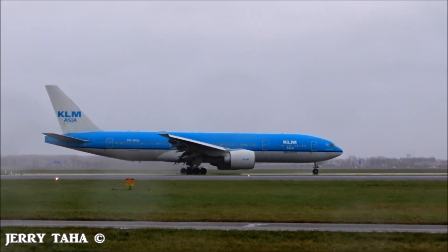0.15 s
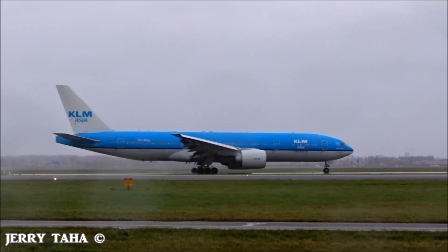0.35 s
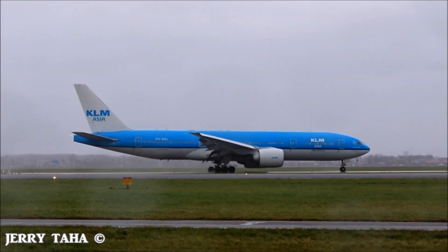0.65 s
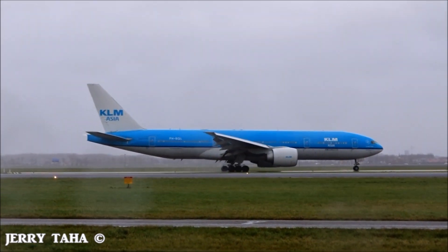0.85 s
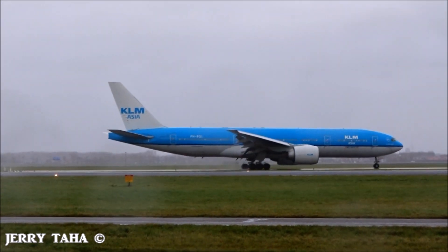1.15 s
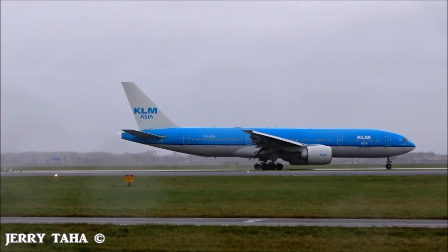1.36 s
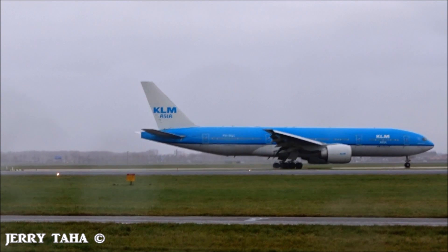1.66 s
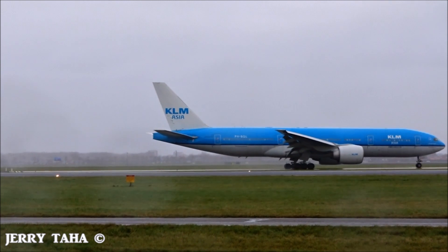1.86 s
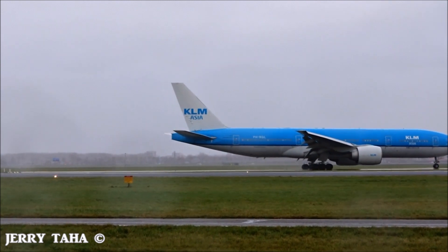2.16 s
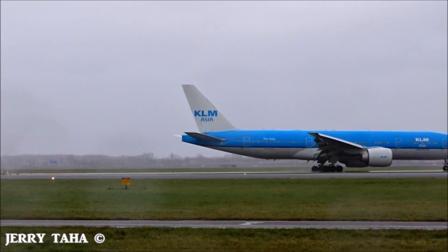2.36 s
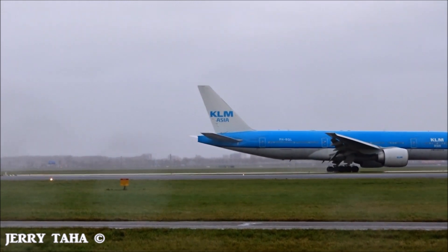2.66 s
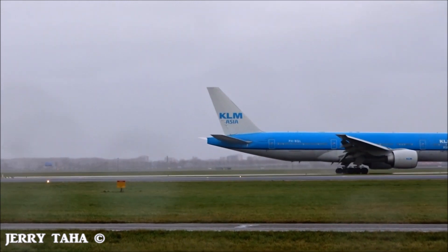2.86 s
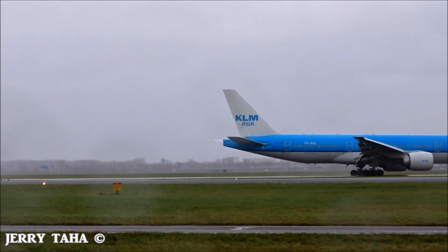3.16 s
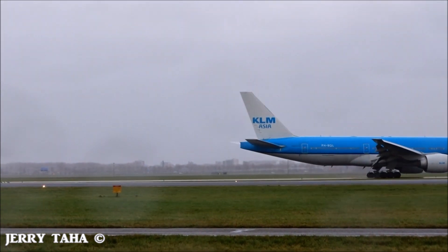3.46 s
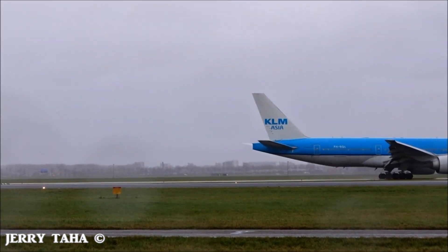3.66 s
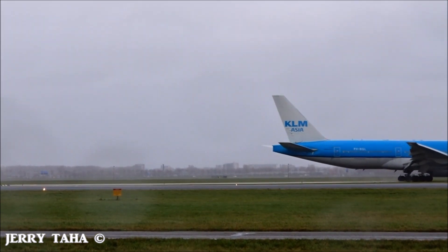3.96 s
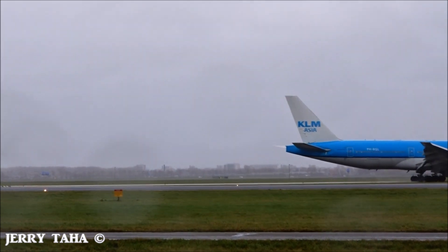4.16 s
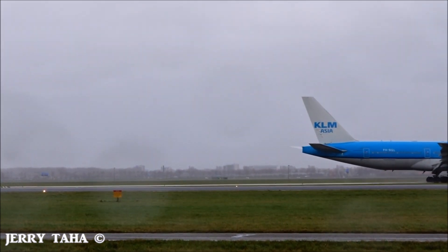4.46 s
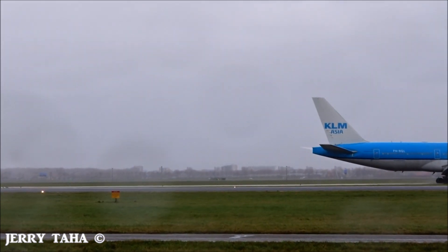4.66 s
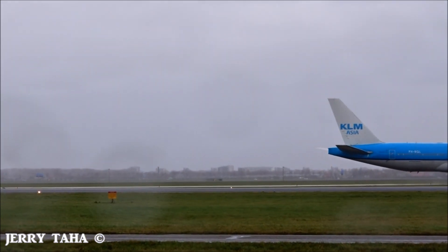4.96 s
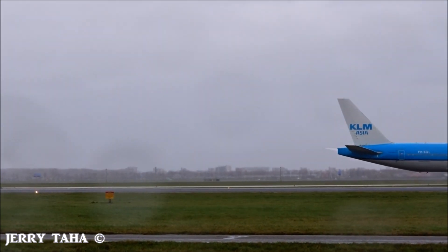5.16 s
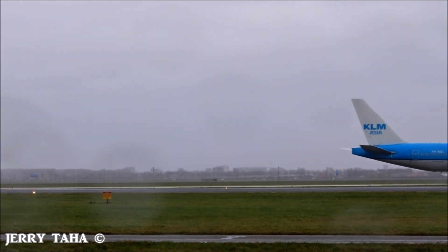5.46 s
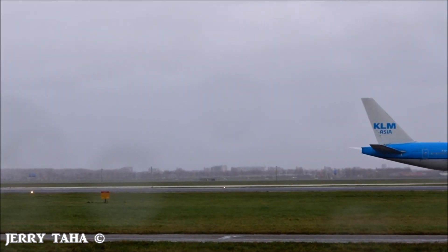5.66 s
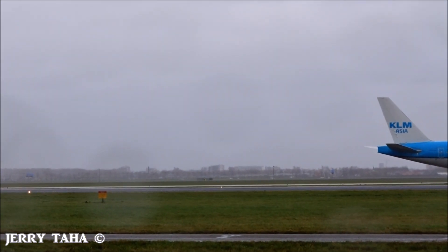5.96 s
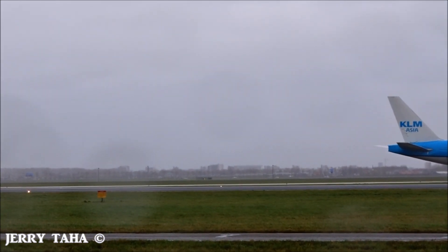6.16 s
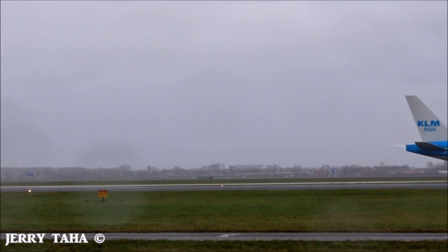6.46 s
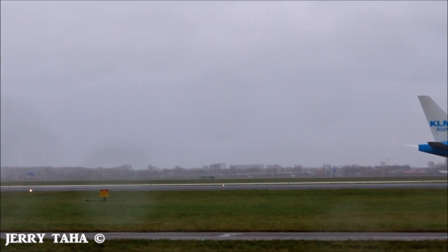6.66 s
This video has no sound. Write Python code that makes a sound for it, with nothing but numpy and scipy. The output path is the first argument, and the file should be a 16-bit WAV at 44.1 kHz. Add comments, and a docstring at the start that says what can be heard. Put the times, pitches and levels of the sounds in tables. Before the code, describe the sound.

Violent, crackling wind buffeting almost buries the dull roar of a large jet rolling away on a runway, with scattered rain ticks and plastic knocks.

```python
"""Airliner in a storm, from across the grass

A large airliner rolls along a wet runway; its roar is shaped noise that shows in the lulls and fades as it moves off.
Gusts bury it at the camera's two microphone ports: noise shaped into buffeting, rumble, hiss and a hollow howl.
Raindrops tick on the camera as short damped tones, and knocks ring the modes of its housing.
A limiter holds the strongest blasts."""
import sys
import numpy as np
from scipy import signal
from scipy.fft import rfft, irfft, next_fast_len
from scipy.io import wavfile
from scipy.ndimage import uniform_filter1d, minimum_filter1d

SR = 44100
rng = np.random.default_rng(int(sys.argv[2]) if len(sys.argv) > 2 else 0)


def dump(signal):
    """Clip the signal to [-1, 1] and save it as 16-bit WAV at the path in sys.argv[1]."""
    limited = np.clip(np.atleast_2d(signal).T, -1, 1)
    pcm = np.round(limited * 32767).astype(np.int16)
    wavfile.write(sys.argv[1], SR, pcm)


N = 299873  # length in samples

FULL_DB = -17.5  # strength of a full gust


def undb(db):
    """Decibels to gain."""
    return 10 ** (np.asarray(db) / 20)


def curves(table):
    """The columns of a table joined by straight lines in time."""
    s, *columns = np.transpose(table)
    return [np.interp(np.arange(N) / SR, s, c) for c in columns]


def across(table, hz):
    """The columns of a table joined by straight lines in log frequency."""
    f, *columns = np.transpose(table)
    return [np.interp(np.log(hz), np.log(f), c) for c in columns]


def pan(db):
    """Left and right gains for a left minus right level difference."""
    return undb(np.array([[.5], [-.5]]) * db)


def walk(rate):
    """Random levels held about 1 / rate s and smoothed twice; spread near 1."""
    k = max(int(SR / rate), 2)
    held = np.repeat(rng.standard_normal(N // k + 2), k)[:N]
    return uniform_filter1d(uniform_filter1d(held, k), k) * np.sqrt(2)


def bins():
    """Frequencies of the bins in which noise is coloured."""
    size = next_fast_len(N // 2 + 1)
    return np.maximum(np.arange(size + 1) * SR / (2 * size), 1)


def turbulence(colour, likeness, lag=0, balance_db=0):
    """Coloured noise at two ports that share part of it; lag is the left's, in radians; their mean has rms 1."""
    hz = bins()
    shared, apart = rfft(rng.standard_normal((2, 2 * len(hz) - 2)))
    alike = np.clip(likeness, 0, 1)
    sign = np.array([[1], [-1]])  # left, right
    pair = np.sqrt(1 + alike) * shared + sign * np.sqrt(1 - alike) * apart
    pair = pair * np.exp(-.5j * sign * lag) * pan(balance_db)
    x = irfft(pair * undb(across(colour, hz)[0]))[:, :N]
    return x / x.mean(axis=0).std()


def split(x, hz):
    """The parts of a sound below and above a frequency."""
    low = signal.sosfiltfilt(signal.butter(3, hz, fs=SR, output="sos"), x)
    return low, x - low


def steady(x, seconds):
    """Even out the slow swells of a noise, leaving its quick flutter."""
    size = int(seconds * SR)
    power = uniform_filter1d(x.mean(axis=0) ** 2, size)
    return x / np.sqrt(uniform_filter1d(power, size))


def swell(start, rise, hold, decay):
    """An envelope that rises, holds and dies away."""
    t = np.arange(N) / SR - start
    return np.clip(t / rise, 0, 1) * np.exp(-np.maximum(t - rise - hold, 0) / decay)


def add(out, s, sound):
    """Mix a short sound in at its time."""
    start = int(s * SR)
    out[:, start:start + sound.shape[-1]] += sound[..., :N - start]


def jet(waver_db=1.7):
    """Exhaust roar and fan rush from afar; the moving air makes each waver and soaks up the top."""
    # The jet rolling past and away. Each row: time in seconds, level in dB.
    passing = [(0, -27.5), (2.15, -26), (2.8, -26.5), (3.3, -25), (5, -33), (6.1, -32), (6.35, -33),
               (6.8, -46)]
    # Spectrum of the distant engines. Each row: frequency in Hz, relative density in dB per Hz.
    engine_colour = [(30, -7), (120, 3.5), (250, 4), (420, 4.5), (700, 1.5), (1100, -1.5), (1700, -5),
                     (2500, -14.5), (3600, -22), (5000, -35), (6000, -62), (7500, -49), (15000, -72)]
    likeness = across([(100, 0.75), (900, 0.48), (4000, 0.68)], bins())[0]  # Hz, 0-1
    exhaust, fan = split(turbulence(engine_colour, likeness, 0.26, 1.8), 1180)
    exhaust = exhaust * undb(waver_db * walk(9.8))
    fan = fan * undb(0.66 * waver_db * walk(19))
    return (exhaust + fan) * undb(curves(passing)[0])


def raindrops(strength_db, swell_s=0.000087, count=80, spray_db=-36, spread_db=3, splash_db=-13):
    """Each drop gives a dead tick of a few cycles; the gusts throw fine spray between the large ones."""
    # Large drops on the camera, before their splash is softened.
    # Each row: start in seconds, peak in dB, pitch in Hz, left minus right in dB.
    large = [(.5555, -15, 2320, -3), (2.1135, -18.5, 3330, -5), (2.1571, -9.5, 2150, -3),
             (2.182, -24, 3200, 0), (3.0596, -4, 2420, -9), (3.305, -28, 4200, 3), (3.497, -24, 4370, -7),
             (3.7515, -25, 5500, -2), (3.777, -27, 5200, -2), (4.25, -13, 3200, -2), (4.458, -8, 2960, -16),
             (6.0507, -37, 5900, 0), (6.299, -29, 4500, -3)]
    out = np.zeros((2, N))
    t = np.arange(SR // 100) / SR
    thrown_db = spray_db + strength_db - FULL_DB
    spray = []
    for when, size, pitch, side in rng.random((count, 4)):
        peak_db = thrown_db[int(when * N)] - spread_db * np.log(size + .02)
        spray.append((when * N / SR, peak_db, 2500 + 2500 * pitch, -6 * side))
    for s, db, hz, side_db in list(large) + spray:
        tick = (t / swell_s) ** 2 * np.exp(-t / swell_s) * np.sin(2 * np.pi * hz * t)
        add(out, s, tick / np.abs(tick).max() * undb(db) * pan(side_db))
    dull, splash = split(out, 6800)
    return dull + undb(splash_db) * splash


def muffle(x, hz=5400, leak_db=-33):
    """The housing passes little treble to the ports."""
    return signal.sosfilt(signal.butter(10, hz, fs=SR, output="sos"), x) + undb(leak_db) * x


def knocks(contact_s=0.0018, rattle=0.3, place_db=2.0, press_s=0.00054):
    """A short, rattling contact cracks and rings the plastic housing; harder blows wake the higher modes."""
    # Knocks, some with a bounce, before the housing muffles them. Each row: start in seconds,
    # peak of the ring in dB, share of the full ring time, crack 0-1, hardness in dB per octave.
    blows = [(.506, -10, 0.5, .02, .5), (.5074, -13, .5, .02, -4), (2.682, -11, 0.64, 0.3, -9),
             (2.684, -14, .5, .02, -8), (5.845, -22, .63, .05, -5.5), (5.856, -16.5, .75, .04, -6),
             (6.0374, -15, 0.96, .9, -4), (6.0455, -20, .9, .04, -7), (6.134, -26, .4, .2, -4)]
    # What the housing rings with, before hardness and place act.
    # Each row: frequency in Hz, level in dB, full 60 dB ring time in seconds.
    modes = [(1380, 4, .035), (1570, -1, 0.025), (1773, 9, .056), (1864, 2, .04), (2030, 2, .036),
             (2200, -2, .02), (3500, -4, .008), (4100, -5, .008), (5160, 1.5, .02)]
    out = np.zeros((2, N))
    t = np.arange(SR // 8) / SR
    for s, db, length, crack, hardness_db in blows:
        favour = place_db * rng.standard_normal(len(modes))  # each blow favours other modes
        ring = np.zeros(len(t))
        for (hz, mode_db, t60), more_db in zip(modes, favour):
            start_db = mode_db + more_db + hardness_db * np.log2(hz / modes[0][0])
            ring += undb(start_db - 60 * t / (t60 * length)) * np.sin(2 * np.pi * hz * t)
        chatter = rng.standard_normal(len(t)) * np.exp(-t / contact_s)
        rattling = signal.fftconvolve(chatter / np.linalg.norm(chatter), ring)[:len(t)]
        body = ring + rattle * rattling
        press = 1 - np.exp(-t / press_s)
        body = body / np.abs(press * body).max()
        add(out, s, press * (body + crack * np.diff(chatter, prepend=0)) * undb(db))
    return muffle(out)


def gusts(collapse=0.21, breeze_rasp_db=-18, breeze_hiss_db=-52, breeze_howl_db=-30):
    """Wind strength in dB and its power-weighted colour; a spent gust collapses into the breeze."""
    # Gusts on the ports, before the collapse sharpens their ends. Each row: start, rise, hold and decay
    # in seconds, strength in dB, then relative levels in dB: upper roar (to the deep roar),
    # rasp, hiss and howl (to the strength), all before each sound's own trims.
    blasts = [(-.083, 0.057, 0.29, 0.058, -14.5, 4, -14, -34.5, -33),
              (0.294, 0.023, 0.14, 0.016, -19, 7.5, -19.5, -48, -24),
              (0.517, 0.032, 0.051, 0.062, -12, 1.5, -17.5, -49, -22),
              (0.599, .025, 0.073, 0.042, -14, 0.5, -12.5, -40, -24),
              (0.692, 0.045, 0.26, 0.33, -15, 5.5, -15.5, -42.5, -11),
              (1.133, 0.032, 0.092, 0.019, -15.5, 1, -16.5, -39, -33),
              (1.272, 0.024, 0.16, 0.031, -14.5, 2, -14.5, -47.5, -18),
              (1.45, 0.022, 0.27, 0.15, -14, 6.5, -15, -45, -7.5),
              (1.702, .012, .035, .015, -15, 3, -9, -40, -20),
              (1.834, 0.016, 0.032, 0.035, -10, 2, -13.5, -44, -18),
              (1.932, 0.02, 0.042, 0.023, -14.5, 4, -15, -46, -17),
              (2.003, .015, .035, .022, -19, 8, -16, -46, -13),
              (2.066, 0.023, 0.19, .03, -29.5, -2, -9, -42, -20),
              (2.257, 0.071, .28, 0.027, -13, 4, -17, -49, -15),
              (2.615, 0.016, 0.029, 0.018, -16.5, 3, -12.5, -44, -18),
              (2.706, 0.003, 0.011, .006, -15, -3, -22, -51, -11),
              (2.728, 0.0058, 0.013, .03, -24, 6, -15, -40, -20),
              (2.826, 0.018, 0.24, 0.1, -14, 1, -15, -45.5, -12),
              (3.151, 0.012, 0.035, 0.015, -20, 2, -15.5, -46, -22),
              (3.279, .01, .025, .015, -23.5, 4, -18, -52, -22),
              (3.34, 0.019, 0.01, 0.033, -17, 2, -20.5, -58, -25),
              (3.432, 0.015, 0.011, 0.034, -15, -3, -21, -55, -25),
              (3.479, .012, 0.016, .012, -19, -2, -18, -52, -22),
              (3.528, 0.0087, 0.006, 0.011, -10, -1.5, -22, -49, -25),
              (3.551, 0.0094, 0.033, .018, -13, -2.5, -18, -48, -27),
              (3.603, 0.04, 0.13, 0.014, -12.5, -2, -17.5, -45.5, -25),
              (3.794, .022, 0.99, 0.1, -12.5, -1.5, -15.5, -40, -17),
              (4.835, 0.033, 0.06, 0.063, -8, 0.5, -14.5, -39, -9),
              (4.963, 0.05, 0.52, 0.34, -14.5, 1.5, -15, -38.5, -7.5),
              (5.787, 0.021, 0.03, 0.0098, -18.5, -1, -18, -44, -22),
              (5.845, .006, .018, .012, -20.5, 6.5, -21, -47.5, -16),
              (5.89, 0.0088, 0.026, 0.009, -20.5, 7, -22, -53, -20),
              (5.965, 0.0073, .036, 0.034, -19.5, -2.5, -20.5, -48, -24),
              (6.262, 0.06, 0.13, 0.5, -19.5, 3, -15, -37.5, -30)]
    # The steady wind under the gusts. Each row: time in seconds, level in dB.
    breeze = [(0, -27), (.42, -19.5), (.49, -21.5), (.6, -20), (1.5, -21.5), (1.95, -19), (2.15, -28),
              (2.8, -29), (3.3, -27), (3.5, -22.5), (4.1, -35), (5.95, -34), (6.11, -43), (6.24, -32),
              (6.3, -29), (6.8, -47)]
    powers = [undb(curves(breeze)[0]) ** 2]
    colours = [(0.0042, breeze_rasp_db, breeze_hiss_db, breeze_howl_db)]
    for start, rise, hold, decay, db, *colour in blasts:
        flow = swell(start, rise, hold, decay)
        flow = flow * np.tanh((flow / collapse) ** 4)
        powers.append((flow * undb(db)) ** 2)
        colours.append(colour)
    total = np.sum(powers, axis=0)
    return 10 * np.log10(total), *(np.transpose(colours) @ np.array(powers) / total)


def hiss(eddies, strength_db, share_db, steepen=0.25, floor_db=-78,
         flicker_db=1.0, sputter_db=1.56, drift_db=0.76):
    """A thin, flickering hiss grows faster than the gust that drives it, and flares in short spurts."""
    # Spectrum of the hiss. Each row: frequency in Hz, relative density in dB per Hz.
    hiss_colour = [(3000, -7), (6000, 8), (7000, 6.5), (8200, 2), (10000, 2.5), (13000, -3), (15500, -8)]
    # Spurts of fine hiss, before the flicker. Each row: start in seconds, hold in seconds, level in dB.
    flares = [(0.59, 0.053, -48.5), (0.855, 0.03, -49), (1.275, 0.033, -52), (1.359, 0.11, -50),
              (1.625, 0.2, -50.5), (1.712, 0.0094, -53), (1.847, 0.019, -46), (2.35, 0.028, -51.5),
              (2.61, 0.022, -55), (2.93, 0.031, -55), (4.363, 0.13, -53), (4.88, .03, -53),
              (5.26, .03, -57), (6.45, 0.053, -59)]
    rise_s, decay_s = 0.017, 0.018
    likeness = across([(7500, .15), (12000, 0.98)], bins())[0]  # Hz, 0-1
    driven = undb(strength_db + share_db + steepen * (strength_db - FULL_DB))
    spurts = sum(undb(db) * swell(s, rise_s, hold, decay_s) for s, hold, db in flares)
    level = np.sqrt(driven ** 2 + spurts ** 2 + undb(floor_db) ** 2)
    flicker = undb(flicker_db * eddies + sputter_db * walk(220) + drift_db * walk(21.0))
    return turbulence(hiss_colour, likeness, 0, -.8) * level * flicker


def howl(level_db, width_hz=90, side_db=-2.5):
    """Air streaming past the camera rings in a broad note whose pitch rises a little, then sinks."""
    # Pitch of the hollow howl. Each row: time in seconds, centre in Hz.
    howl_pitch = [(0, 660), (1.7, 741), (3, 722.5), (4.2, 432.5), (5.2, 372.5), (6.8, 363)]
    hz = curves(howl_pitch)[0]
    swirl = walk(2 * width_hz) + 1j * walk(2 * width_hz)  # random level and phase broaden the note
    note = (swirl * np.exp(2j * np.pi * np.cumsum(hz) / SR)).real
    return note * undb(level_db) * pan(side_db)


def rumble(trim_db=0, waver_db=1.5):
    """Eddies larger than the camera push on both ports nearly alike: a lumpy bed, and single thumps."""
    # Spectrum of the rumble. Each row: frequency in Hz, relative density in dB per Hz.
    rumble_colour = [(12, -21), (25, -11), (45, -4), (72, -5.5), (110, -6), (200, -19.5), (500, -86)]
    # Bed between the thumps, before it wavers. Each row: time in seconds, level in dB.
    bed_level = [(0, -39), (.45, -22.5), (1.5, -29.5), (2.5, -27.5), (3.7, -26.5), (4.1, -49), (4.7, -35),
                 (5.9, -31), (6.2, -37.5), (6.8, -38)]
    # Large eddies that thump. Each row: centre in seconds, half length (bell spread) in seconds, level in dB.
    large_eddies = [(0.295, .04, -20), (.59, 0.04, -24), (.78, 0.034, -26), (1.077, .06, -20),
                    (1.61, .025, -16), (1.968, 0.024, -16), (2.088, .03, -25), (2.228, 0.022, -22),
                    (2.31, 0.033, -14), (2.598, 0.04, -19), (2.71, 0.009, -16), (2.885, 0.034, -21),
                    (3.574, .05, -19.5), (4.108, .025, -23), (4.9, .03, -19.5), (5.25, 0.036, -35),
                    (5.855, .025, -24), (6.05, 0.025, -26.5), (6.304, 0.03, -21.5)]
    t = np.arange(N) / SR
    bed = undb(curves(bed_level)[0] + waver_db * walk(14))
    thumps = sum(undb(db) * np.exp(-.5 * ((t - s) / half) ** 2) for s, half, db in large_eddies)
    air = steady(turbulence(rumble_colour, 0.85, .12, .6), 0.098)
    return air * np.hypot(bed, thumps) * undb(trim_db)


def spits(per_s=190, length_s=.0013):
    """Small eddies burst at random, at each port on its own: a spiky power envelope with mean 1."""
    bursts = (rng.random((2, N)) < per_s / SR) * rng.exponential(size=(2, N))
    t = np.arange(SR // 50) / SR
    power = signal.oaconvolve(bursts, [t * np.exp(-2 * t / length_s)], axes=1)[:, :N]
    return np.abs(power) / power.mean()


def buffeting(eddies, strength_db, lift_db, small_db, flutter_db=0.53, rasp_flutter_db=0.78,
              headroom=4.9, body_db=0.55, rasp_db=-0.53, waver_db=0.3, fitful_db=0.85,
              lump_db=0.75, surge_db=0.7, burst_share=.4):
    """Eddies break on the ports: a deep roar and a crackling rasp; weak wind comes in fits."""
    # Spectrum of the buffeting, before the gusts tilt it.
    # Each row: frequency in Hz, relative density in dB per Hz.
    buffet_colour = [(40, -21), (90, -6), (135, 1.5), (200, 0.5), (290, -1.5), (450, -4), (800, -8),
                     (1150, -13), (1500, -18.5), (2350, -25), (2900, -26.5), (5000, -38.5), (5900, -44.5),
                     (7000, -73), (9000, -75)]
    # How the two ports differ in the wind, before it veers. Each row: frequency in Hz, likeness 0-1,
    # left lag in radians, left minus right in dB.
    ports = [(60, 0.84, .25, -0.5), (132, 1, 0.66, 0.5), (274, 0.67, 0.62, -2.5), (445, 0.49, 0.33, -2),
             (850, 0.88, 0.97, -0.5), (1290, 0.95, 0.76, -2), (2400, .53, 0.16, -6.5),
             (2830, 0.57, 0.16, -4.5), (3800, 0.87, 0.41, -3.5), (5500, 0.7, 0.7, -2.5), (7000, .3, .7, -9)]
    air = turbulence(buffet_colour, *across(ports, bins()))
    roar, rasp = split(air, 1523)
    deep, upper = split(roar, 570)
    flutter = (eddies + walk(130)) / np.sqrt(2)
    # part of the power comes in separate bursts
    crackle = np.sqrt(1 - burst_share + burst_share * spits())
    upper = upper * np.sqrt(crackle) * undb(lift_db + flutter_db * flutter)
    roar = steady(deep + upper, 0.027)
    rasp = steady(rasp * crackle * undb(rasp_flutter_db * eddies), 0.053)
    rasp = rasp * undb(small_db + rasp_db + surge_db * walk(40))
    # the narrow ports choke the largest pressure swings
    roar = headroom * np.tanh(roar / headroom)
    roar = roar * undb(body_db + lump_db * walk(60))
    weak = 1 / (1 + undb(2 * (strength_db - FULL_DB)))
    return (roar + rasp) * undb(strength_db + (waver_db + fitful_db * weak) * walk(55))


def veer(x, strength_db, below_hz=450, lull_unlike_db=-4.0, span_db=12):
    """A gust hits each port with its own eddies; in a lull the bass grows more alike in both."""
    # Slow veering of the wind, on top of each sound's own balance.
    # Each row: time in seconds, left minus right in dB, how unlike the ports are in dB.
    veering = [(0, -0.5, 0), (1.05, 0, 0), (1.75, -1, 0.5), (2.2, .5, -1.5), (2.38, 0, 1), (2.6, -0.5, 0.5),
               (2.75, 3, 3), (2.95, -1, 0.5), (3.4, 0, -4), (3.95, -1.5, 0), (4.45, .5, 0), (5.85, -1.2, 0),
               (6.15, 1, 0), (6.7, -1.5, 0.5), (6.8, -2, -0.5)]
    lull = np.clip((FULL_DB - strength_db) / span_db, 0, 1) ** 2
    deep, upper = split((x[0] - x[1]) / 2, below_hz)
    balance_db, unlike_db = curves(veering)
    side = (deep * undb(lull * lull_unlike_db) + upper) * undb(unlike_db)
    return (x.mean(axis=0) + np.array([side, -side])) * pan(balance_db)


def scene():
    """Wind at the camera over the distant jet."""
    eddies = walk(110)  # one quick flutter shared by the buffeting and the hiss
    strength_db, lift_db, rasp_db, hiss_db, howl_db = gusts()
    wind = buffeting(eddies, strength_db, lift_db, rasp_db)
    wind = wind + howl(strength_db + howl_db) + rumble()
    wind = veer(wind, strength_db) + hiss(eddies, strength_db, hiss_db)
    return jet() + raindrops(strength_db) + knocks() + wind


def record(dry, ceiling=0.86, top_hz=15750):
    """A look-ahead limiter ducks the highest crests; the ends are eased and the top is cut."""
    size = SR // 100
    peaks = np.abs(dry).max(axis=0)
    gain = minimum_filter1d(ceiling / np.maximum(peaks, ceiling), 2 * size)
    gain = uniform_filter1d(uniform_filter1d(gain, size), size)
    gain = gain * signal.windows.tukey(N, size / 2 / N)
    return signal.sosfilt(signal.ellip(10, .1, 80, top_hz, fs=SR, output="sos"), dry * gain)


dry = scene()
out = record(dry)
dump(out)
```